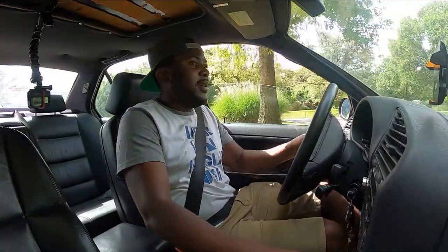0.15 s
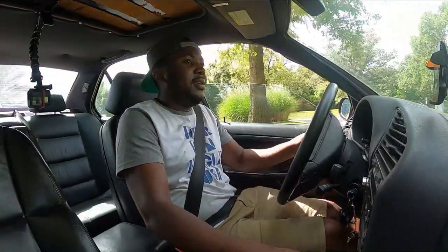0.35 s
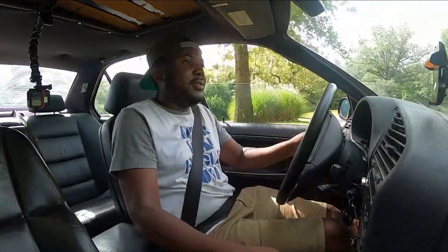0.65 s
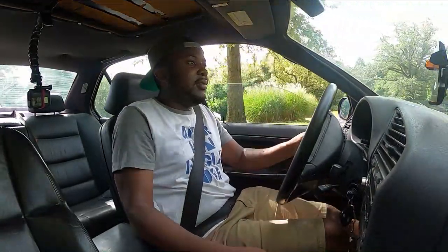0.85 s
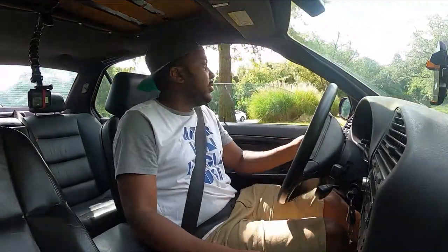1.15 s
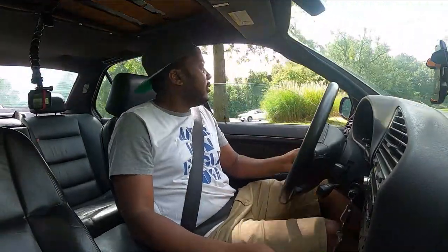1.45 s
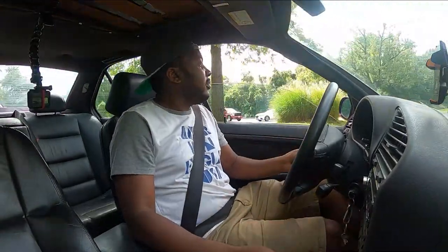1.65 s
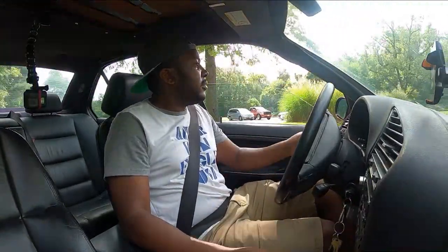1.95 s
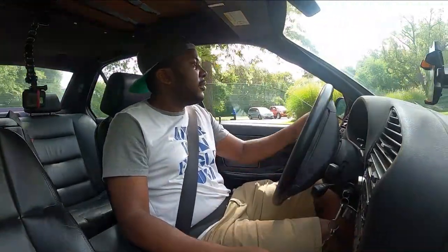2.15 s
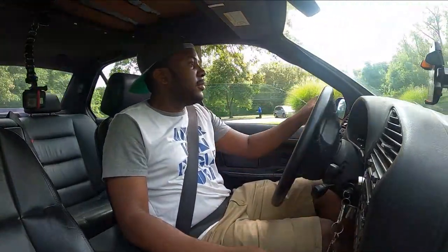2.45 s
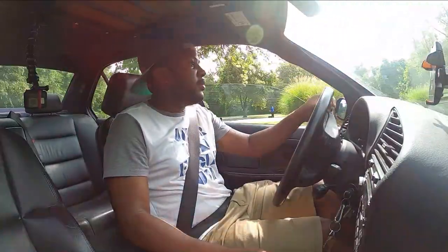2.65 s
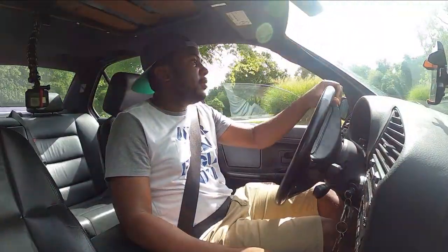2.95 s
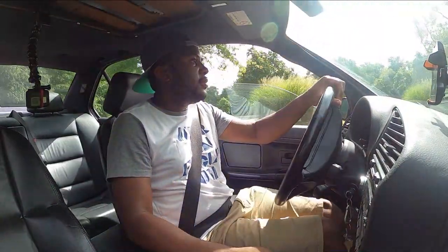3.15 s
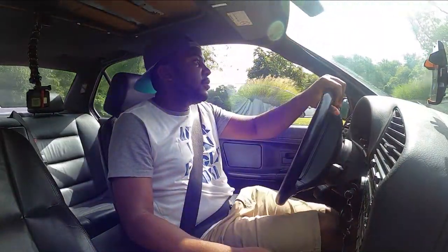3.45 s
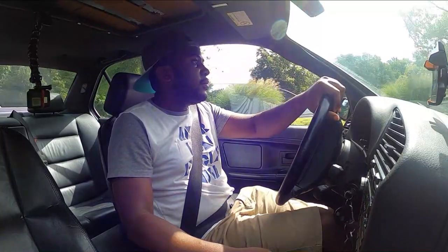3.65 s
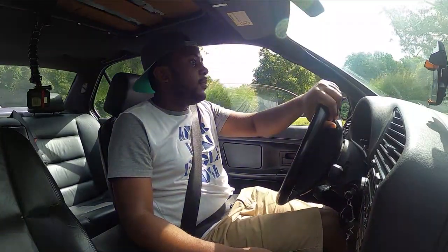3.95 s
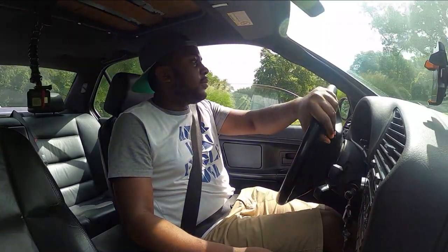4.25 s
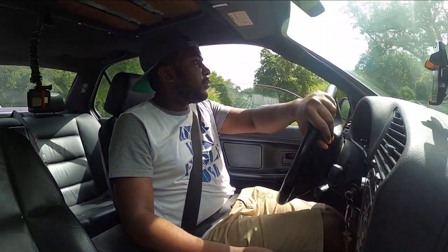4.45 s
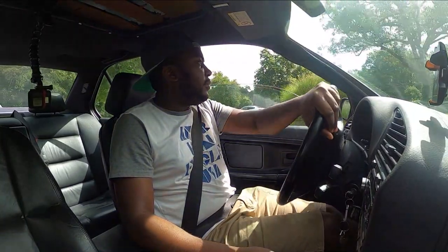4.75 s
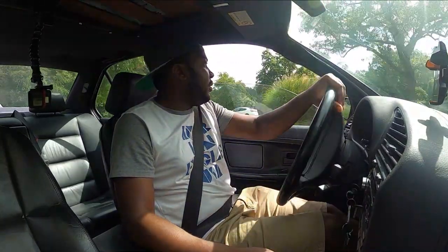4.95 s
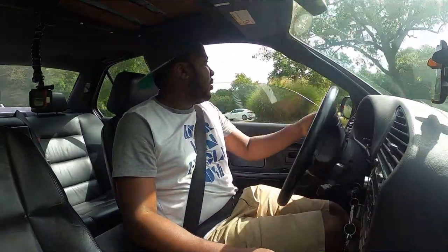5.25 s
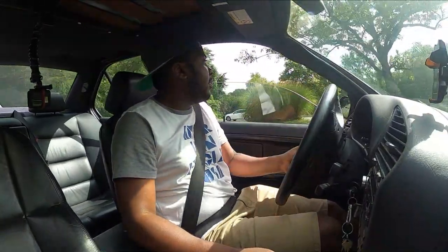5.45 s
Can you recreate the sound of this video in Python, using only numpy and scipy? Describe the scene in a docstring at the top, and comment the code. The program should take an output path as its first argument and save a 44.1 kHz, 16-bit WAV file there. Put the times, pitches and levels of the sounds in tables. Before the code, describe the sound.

Inside a moving car, a deep exhaust drone drops at a gear change, pulls again, then coasts down under rattling plastic trim and soft road rumble.

```python
"""Inside a slowly moving car, one microphone in the cabin. The exhaust drones as sines on multiples
of one slow beat, drops as a gear is changed, pulls again and coasts down. Plastic trim rattles as
decaying modes; fittings tick and scuffs rub as shaped noise bursts; suspension thumps and squeaks are
swept or damped sines. Behind them lie noise bands for road rumble, sway, hiss and whine, and low hums."""
import sys
import numpy as np
from scipy import signal
from scipy.fft import rfft, irfft
from scipy.io import wavfile
from scipy.ndimage import uniform_filter1d

SR = 44100
rng = np.random.default_rng(int(sys.argv[2]) if len(sys.argv) > 2 else 0)


def generate_wav(sig):
    """Save sig (samples, or channels by samples) to the path in sys.argv[1] as 16-bit PCM at SR."""
    pcm = np.round(np.clip(np.atleast_2d(sig).T, -1, 1) * 32767).astype(np.int16)
    wavfile.write(sys.argv[1], SR, pcm)


N = 246809

# tyre rumble: (t/s, level/dB)
TYRE_CURVE = [(0, -37), (.5, -32), (1.2, -33.5), (1.5, -33.5), (1.9, -36), (2.9, -37), (3.3, -36.5),
              (3.9, -35.5), (4.8, -34.5), (5.6, -32)]
# road: (t/s, body sway level/dB, hiss level/dB, hiss lift above 2 kHz/(dB per octave))
ROAD_CURVE = [(0, -38, -35.5, 5), (.15, -36.5, -40, 4.5), (.6, -40, -41.5, 3), (1.03, -43, -46.5, 2),
              (1.6, -46, -44.5, 5), (1.95, -55.5, -44.5, 3.5), (2.25, -52.5, -46, 2),
              (2.73, -43.5, -46.5, 5.5), (3.05, -51.5, -44, -1.5), (3.3, -46.5, -44, -0.5),
              (3.5, -38, -42, -1.5), (3.96, -49, -44.5, -1), (4.47, -48, -43, -4), (4.9, -51, -43, -2.5),
              (5.11, -37, -43.5, 0.5), (5.3, -46, -46, 2.5), (5.6, -45, -42.5, 5.5)]
# noise colours: (f/Hz, relative level/dB)
RUMBLE_SPECTRUM = [(55, -16), (95, 3), (140, 1.5), (185, 2), (230, 3.5), (280, -2.5), (345, -11),
                   (420, -14), (600, -62.5)]
SWAY_SPECTRUM = [(22, -35.5), (32, -3), (44, 8), (60, -2.5), (85, -18.5), (130, -58.5)]
HISS_SPECTRUM = [(210, -24.5), (350, 3), (580, -8), (641, -8.5), (720, -0.5), (785, -3.5), (1050, -11.5),
                 (1440, -17.5), (1790, -18), (2350, -22.5), (5050, -37), (5830, -41.5), (9500, -57),
                 (12500, -76.5), (14500, -120)]
# gliding noise bands: (start f/Hz, glide/(Hz per s), width/Hz, start level/dB, fall/(dB per s))
WHINE_BANDS = [(3660, -250, 260, -57, 45.5), (5050, -850, 290, -59.5, 25.5), (2466, -200, 1000, -51, 44),
               (5910, -1.5, 510, -78.5, 0.5)]
# low hums apart from the exhaust, one table each; the last two overlap: (t/s, f/Hz, level/dB)
HUM_PATHS = [
    [(0, 340.7, -36), (.06, 349.2, -38.5), (.13, 338.5, -36), (.21, 357.6, -39), (.3, 352, -36),
     (.56, 345.6, -38.5), (.88, 310.3, -49), (1.0, 301, -53)],
    [(4.5, 347.3, -46), (4.59, 335.4, -40), (4.72, 311.7, -50), (4.95, 294.5, -52)],
    [(4.6, 231.8, -48.5), (5.15, 226.4, -36), (5.45, 224.3, -49)],
]
# one table a squeak tone; the two at 1.59 s sound together as one squeak:
# (t/s, f/Hz, level of the tone without its octave/dB)
SQUEAK_PATHS = [
    [(1.59, 6400, -66), (1.665, 6350, -72)],
    [(1.59, 10350, -77), (1.655, 10400, -75)],
    [(2.345, 6330, -60), (2.4, 6316, -77.5)],
    [(5.025, 5176, -78), (5.04, 5470, -61), (5.075, 5690, -65), (5.09, 6010, -63), (5.115, 5950, -66),
     (5.15, 5620, -73), (5.19, 5870, -72), (5.25, 6020, -73), (5.295, 5900, -71), (5.335, 6050, -62)],
]
# suspension thumps: (t/s, swing level/dB, panel boom level/dB)
THUMP_EVENTS = [(.447, -21, -42), (.472, -16, -15.5), (.625, -20.5, -21), (.93, -30, -23), (.739, -29, -41),
                (1.328, -17, -38)]
# scuffs over the trim, and a short noisy ring with the tick at 1.55 s:
# (t/s, length/s, level/dB, tilt/(dB per octave), ring f/Hz)
SCUFF_EVENTS = [(0.457, 0.031, -34, -13, 750), (0.485, 0.027, -45, -9, 1790), (0.533, 0.034, -40, -14, 780),
                (0.611, 0.032, -42, -12, 1770), (0.905, 0.064, -42, -12, 860),
                (0.929, 0.023, -43, -18, 1840), (1.465, .11, -39.5, -12, 799.7),
                (1.806, 0.013, -55, -7.5, 2693), (1.547, 0.0092, -44, 0, 4213),
                (1.6, 0.033, -55.5, -8, 2500), (1.691, .015, -55.5, -7, 2800),
                (2.68, 0.042, -53, -10.5, 1480), (3.318, 0.021, -49, -11, 799),
                (3.833, 0.081, -66, -2, 4143), (4.394, 0.045, -50, -16, 790.5),
                (5.163, 0.034, -62, -7.5, 3222), (5.228, 0.051, -58, -7, 3428),
                (4.431, 0.041, -52.5, -10.5, 1690), (5.416, 0.01, -40, -8.5, 3100),
                (5.414, 0.036, -47.5, -8, 1970), (5.503, 0.0097, -44, -12, 3020),
                (5.555, 0.014, -52, -13, 3135)]
# ticking fittings: (t/s, level/dB, tilt/(dB per octave))
TICK_EVENTS = [(.175, -43, -2.5), (.2927, -43.5, -11), (.4767, -44.5, -12), (1.1486, -43.5, -11),
               (1.3443, -50, -1.5), (1.3734, -48.5, -9), (1.5496, -34, -3), (1.8145, -44.5, -6.5),
               (2.0503, -47.5, -4.5), (2.0832, -48, -9.5), (2.1848, -53.5, -1.5), (2.8391, -50, -13.5),
               (2.9698, -52.5, -13.5), (3.021, -42.5, -7), (3.2817, -50, -13), (3.3045, -51.5, -12.5),
               (3.353, -54.5, -14.5), (3.7311, -52.5, -9.5), (3.8032, -51, -9.5), (4.1567, -45.5, -12),
               (4.4243, -46.5, -12), (4.7726, -46.5, -12), (5.0744, -50, -5), (5.3392, -50, -9),
               (5.394, -51, -11), (5.374, -50, -11), (5.4146, -46, -11), (5.4998, -41, -11.5),
               (5.5503, -42.5, -12)]
# modes of the plastic trim: (f/Hz, level/dB, t60/s)
TRIM_MODES = [(663.6, -8, 0.035), (771, -6.5, 0.03), (1351, -6, 0.031), (1580, -0.5, 0.014),
              (2726, 2.5, 0.014), (3210, -12, 0.018)]
# blows on the trim: (t/s, level/dB, dull modes/dB, bright modes/dB, lean to the lower middle mode/dB)
RATTLE_EVENTS = [(0.291, -36, -10.0, -3, -3), (0.3206, -23.5, 2, -16, -3), (0.3494, -29.5, 7.5, -9, 3.0),
                 (0.4645, -29, 10.5, -15, -4), (0.4745, -33, 13.5, -19, -3), (0.5174, -38, 7, -2, 4),
                 (0.549, -39, 14.5, -15.0, 5), (0.579, -38, 12, -19, -9), (0.617, -33, 11, -6, -12),
                 (0.778, -33, 8, -20, -7), (0.8217, -36, 9, -17, 3), (0.9083, -30, -1, -16, 0),
                 (0.932, -29.5, -3, -30, -3.0), (1.068, -40, 13.5, -12, -4), (1.1495, -42, 11, -3, 5),
                 (1.3848, -33, 6, -6, -1), (1.415, -35, 3, -10, -2), (1.444, -34, 5, -9, 11),
                 (1.516, -32, 1, -10.0, 0), (1.7543, -29.5, 6, -32, -12), (1.7854, -31, 7.5, -21, -7),
                 (1.81, -41, -6, 0, -9), (1.832, -24, 1, -10.0, -6.5), (1.8415, -31, -6, -3.5, 8),
                 (1.849, -24, -0.5, -10.5, -8), (1.9042, -23, -1, -9.5, 9), (1.9114, -25, -8, -18, -12),
                 (1.9328, -25, 3, -13, -9), (1.9677, -26.5, 1, -10, 10), (1.9763, -23.5, -1, -18, -8),
                 (2.0204, -27, 1, -30, -8), (2.038, -29.5, 5, -18, -6), (2.0818, -29.5, 3.0, -23, -5),
                 (2.14, -32.5, 7, -17.0, -8), (2.1824, -27, 4, -17, -8), (2.2228, -31.5, 2.5, -20.5, -12.5),
                 (2.364, -43, 1, -27.5, 0), (2.388, -29.5, 5, -31, -15), (2.429, -41, 12, -22.5, -3.5),
                 (2.5059, -37, 5, -11.5, -2.5), (2.575, -29.5, 5, -8, 9), (2.5817, -25, 2, -15, -15),
                 (2.61, -32.5, 8.5, -25, -6.5), (2.6391, -29.5, -1.5, -13.5, 13), (2.689, -35, 4, -10.5, 8),
                 (2.696, -37, 9, -22.5, -11), (2.713, -36.5, -5, -6, 9), (2.721, -34.5, 9, -16, 0.5),
                 (2.7375, -31.5, -7, -12.5, 12), (2.7853, -27, -3.5, -8.5, 12.5),
                 (2.831, -29.5, -1, -9, 12), (2.8917, -37, 5, -14.5, 2), (2.9143, -32.5, -1, -12.0, 10),
                 (2.9391, -31, 1, -16, 8), (2.961, -29.5, 0.5, -11, 10.5), (2.9686, -27, -1.5, -10, -5),
                 (2.9908, -28, 2.5, -18, -5.5), (3.037, -38, 5, -18, -5), (3.0846, -31.5, 1.5, -30.5, -8),
                 (3.094, -36, 10, -23.5, -3), (3.1322, -41, 10, -22.0, -10), (3.2552, -34.5, 5, -17, -8),
                 (3.3315, -36.0, -1, -10, -5), (3.4274, -36.0, 6, -20, -2.5), (3.478, -32, 8, -23, -10.5),
                 (3.498, -37.5, 6, -9, -5), (3.533, -22.5, 0, -11, 5), (3.563, -30, 2.5, -21.0, -8),
                 (3.6607, -29.5, 4.5, -26, -12), (3.676, -23.5, -9, -12, 19), (3.709, -31, 6.5, -23, -6),
                 (3.8035, -39, 12, -5, 2.0), (3.847, -34.5, -1, -11, 0), (4.197, -33.5, -8, -12.5, -5.5),
                 (4.246, -38.5, 5, -23, -2), (4.3918, -33.5, 8, -26, 8), (4.4041, -28, 6.5, -22, -4),
                 (4.4245, -40.0, -1, -18, 1), (4.7727, -46, 11, -3, -5), (4.93, -31.5, 2, -19, 6),
                 (4.9523, -27.5, 7, -20, 0), (4.982, -18, 4.5, -14, -10), (5.0447, -32, 3, -16, -14),
                 (5.4146, -28, 11.5, -6.5, -3), (5.4997, -28, 7, -10, 2), (5.5498, -21.5, -1, -16, -3)]
# engine: (t/s, beat of the exhaust f/Hz, throttle as drone level/dB)
ENGINE_CURVE = [(0, 43.3, -36.5), (.06, 48, -34), (.26, 47.4, -34.5), (.38, 48.6, -35.5), (.46, 47, -40.5),
                (.58, 48.15, -40.5), (.74, 45.57, -44.5), (1.04, 39.3, -43), (1.09, 35, -44),
                (1.14, 34.6, -40), (1.2, 33.2, -42.5), (1.245, 32.7, -43), (1.3, 31.8, -37.5),
                (1.42, 34.8, -34.5), (1.51, 33.6, -34.5), (1.64, 27.6, -36.5), (1.78, 33.3, -34),
                (1.9, 30.3, -35), (2.01, 34.8, -34), (2.11, 32.9, -35), (2.23, 37.1, -34.5),
                (2.36, 36.4, -35), (2.45, 38.8, -33.5), (2.54, 38.6, -34), (2.71, 41.4, -34),
                (2.81, 42.03, -34), (3.06, 43.34, -37), (3.24, 44.2, -43.5), (3.4, 43.6, -43.5),
                (3.58, 42, -41.5), (3.74, 39.9, -44), (3.9, 37.4, -43), (4.1, 32, -43), (4.33, 29.3, -43),
                (4.5, 24.8, -43.5), (4.73, 22.6, -47.5), (4.95, 20.6, -47.5), (5.15, 19.5, -49),
                (5.6, 20.1, -46.5)]
# exhaust: (multiple of the beat, level/dB, dB gained per dB of throttle above OPEN_DB)
EXHAUST_ORDERS = [(1, -13.5, -1.5), (2, 4, 1.73), (3, -2, 1.1), (4, 11, 1.77), (5, 1.5, 1.1),
                  (6, 8.5, 1.63), (7, -3.5, 1), (8, 0.5, 1), (9, -4, 2.8), (10, -10, -0.2), (11, -10, 0.9),
                  (12, -3.5, 1.5)]
# what pipe and cabin pass on: (f/Hz, even multiples level/dB, odd multiples level/dB)
PIPE_RESPONSE = [(29.8, -10, -16.5), (42, 3, -11), (59, 5.5, -1.5), (71.5, 9, 5.5), (103, -7.5, -16),
                 (122, -2.5, -5), (136, -8, -3.5), (151.3, -4.5, -0.5), (154.26, 3, 3), (171.7, 10, 9.5),
                 (185.8, 7.5, 8.5), (198.6, 4, 5), (226, -2, 4), (267, -4, -4.5), (293, -15.5, -17),
                 (362, -8, -8.5), (397, -7, -8.5), (438, -17, -18), (610, -27.5, -24)]

OPEN_DB = -34  # throttle level about which the multiples answer
WAVER_DB, WAVER_PER_DB_SHUT = .4, .08  # waver at open throttle; extra dB per dB below it
SLIP = .06  # phase slip of the fourth multiple, radians per dB of waver
STANDING_HZ, STANDING_WIDTH_HZ = (71, 143), 3  # standing waves in the pipe
SPREAD = -.85  # radians, times the multiple squared
PANEL_HZ, PANEL_T60_S = 317, .06
THUMP_HZ, THUMP_T60_S = 56.5, 0.18
TICK_RISE_S, TICK_T60_S = .0012, 0.059
OCTAVE_DB, OCTAVE_HZ, OCTAVE_FALL_DB_PER_KHZ = -3, 11950, 13.5  # a squeak's octave, loudest at OCTAVE_HZ
CABIN_DB, CABIN_T60_S = -12, 0.077
EDGE_HZ = 14800  # upper band limit


def gain_of(db):
    """Decibels to amplitude."""
    return 10 ** (np.asarray(db) / 20)


def evened(x):
    """Scales to an rms of one."""
    return x / np.sqrt(np.mean(x ** 2) + 1e-20)


def read(points, hz):
    """Looks up a spectrum on a log-frequency axis."""
    f, value = np.transpose(points)
    return np.interp(np.log(hz + 1), np.log(f + 1), value)


def columns(rows, t):
    """Every column of a curve table at the times t."""
    s, *rest = np.transpose(rows)
    return [np.interp(t, s, c) for c in rest]


def add(mix, s, sound):
    """Mixes a sound in at s seconds."""
    part = mix[round(s * SR):][:len(sound)]
    part += sound[:len(part)]


def wander(width_s, count):
    """Smooth random curves of rms one."""
    size = max(round(width_s * SR), 1)
    smooth = uniform_filter1d(rng.standard_normal((count, N)), size)
    return evened(uniform_filter1d(smooth, size))


def noise(spectrum, size, patchy_db, lift_db=0):
    """Random short-time spectra with drifting patches; lift tilts the part above 2 kHz."""
    hop = size // 4
    frames, hz = N // hop + 5, np.fft.rfftfreq(size, 1 / SR)
    a, b, patches = rng.standard_normal((frames, len(hz), 3)).T
    patches = uniform_filter1d(patches, size=6, axis=0)  # along frequency
    patches = evened(uniform_filter1d(patches, size=10, axis=1))  # along time
    lift = np.interp(np.arange(frames) * hop, np.arange(N), lift_db * np.ones(N))
    treble_octaves = np.clip(np.log2(hz / 2000 + 1e-9), 0, 3)[:, None]
    level_db = read(spectrum, hz)[:, None] + patchy_db * patches + treble_octaves * lift
    z = (a + 1j * b) * gain_of(level_db)
    return evened(signal.istft(z, nperseg=size, noverlap=size - hop)[1][:N])


def tilted(white, tilt_db):
    """Noise sloped by dB per octave about 5 kHz, more gently above 6 kHz, without bass or top."""
    hz = np.fft.rfftfreq(len(white), 1 / SR)
    octaves = np.log2(np.maximum(hz, 700) / 5000) - 0.21 * np.log2(np.maximum(hz, 6000) / 6000)
    no_bass = hz ** 2 / (hz ** 2 + 500 ** 2)
    no_top = 1 / (1 + (hz / 10500) ** 6)
    return irfft(rfft(white) * gain_of(min(tilt_db, 0) * octaves) * no_bass * no_top)


def cabin(x):
    """Short upholstered-cabin tail: sparse taps of random sign."""
    taps, at = np.zeros(6000), np.arange(100, 5980, 20) + rng.integers(0, 20, 294)
    taps[at] = rng.choice([-1., 1.], len(at)) * gain_of(-60 * at / SR / CABIN_T60_S)
    return signal.oaconvolve(x, taps / np.linalg.norm(taps))[:N]


def road():
    """Tyre rumble through the floor, slow sway of the body and flickering hiss from outside."""
    t = np.arange(N) / SR
    (rumble_db,) = columns(TYRE_CURVE, t)
    sway_db, hiss_db, lift_db = columns(ROAD_CURVE, t)
    rumble = noise(RUMBLE_SPECTRUM, size=4096, patchy_db=2.0)
    sway = noise(SWAY_SPECTRUM, size=8192, patchy_db=0.0)
    hiss = noise(HISS_SPECTRUM, size=512, patchy_db=1.5, lift_db=lift_db)
    flicker_db = 1.3 * wander(0.0099, count=1)[0]
    return gain_of(rumble_db) * rumble + gain_of(sway_db) * sway + gain_of(hiss_db + flicker_db) * hiss


def whine():
    """Downward-gliding noise bands, each fading at its own rate: low-passed noise shifted up in pitch."""
    t, out = np.arange(N) / SR, np.zeros(N)
    draws = rng.standard_normal((len(WHINE_BANDS), 2, N))
    for (hz, glide, width_hz, db, fall_db), (a, b) in zip(WHINE_BANDS, draws):
        slow = signal.lfilter(*signal.butter(2, width_hz / SR), a + 1j * b)
        carrier = np.exp(2j * np.pi * (hz + glide * t / 2) * t)
        out += gain_of(db - fall_db * t) * evened((slow * carrier).real)
    return out


def hums():
    """Rough low tones that drift apart from the exhaust: sines unsteady in pitch and level."""
    out = np.zeros(N)
    waver_db, drift = 2.3 * wander(0.034, count=1)[0], 0.008 * wander(0.022, count=1)[0]
    for rows in HUM_PATHS:
        t = np.arange(rows[0][0], rows[-1][0], 1 / SR)
        hz, db = columns(rows, t)
        tone = np.sin(2 * np.pi * np.cumsum(hz * (1 + drift[:len(t)])) / SR)
        fade = signal.windows.tukey(len(t), .1)
        add(out, t[0], np.sqrt(2) * tone * gain_of(db + waver_db[:len(t)]) * fade)
    return out


def squeaks():
    """Thin stick-slip tones with an octave, jittering in pitch and fluttering in level."""
    out = np.zeros(N)
    flutter_db, jitter = 2.6 * wander(0.0044, count=1)[0], .009 * wander(0.0022, count=1)[0]
    for rows in SQUEAK_PATHS:
        t = np.arange(rows[0][0], rows[-1][0], 1 / SR)
        hz, db = columns(rows, t)
        octave_db = OCTAVE_DB - OCTAVE_FALL_DB_PER_KHZ * abs(2 * hz - OCTAVE_HZ) / 1000
        angle = 2 * np.pi * np.cumsum(hz * (1 + jitter[:len(t)])) / SR
        tone = np.sin(angle) + gain_of(octave_db) * np.sin(2 * angle)
        fade = signal.windows.tukey(len(t), min(0.023 * SR / len(t), 1))
        add(out, t[0], np.sqrt(2) * tone * gain_of(db + flutter_db[:len(t)]) * fade)
    return out


def thumps():
    """Low damped swings of the body, with a short boom of the floor panel."""
    out, t = np.zeros(N), np.arange(12000) / SR
    swing = gain_of(-60 * t / THUMP_T60_S) * np.sin(2 * np.pi * THUMP_HZ * t) * np.minimum(t / 0.0082, 1)
    boom = gain_of(-60 * t / PANEL_T60_S) * np.sin(2 * np.pi * PANEL_HZ * t) * np.minimum(t / 0.0022, 1)
    for s, db, boom_db in THUMP_EVENTS:
        add(out, s, gain_of(db) * swing + gain_of(boom_db) * boom)
    return out


def scuffs():
    """Grainy noise bursts, each with one broad ring: friction on the trim, and the ring with one tick."""
    out, grain_db = np.zeros(N), 4.5 * wander(.0013, count=1)[0]
    draws = rng.standard_normal((len(SCUFF_EVENTS), 8192))
    for (s, length_s, db, tilt_db, hz), white in zip(SCUFF_EVENTS, draws):
        size = min(round(length_s * SR), 8192)
        ring = evened(signal.filtfilt(*signal.iirpeak(hz, 6., SR), white))
        burst = evened(tilted(white, tilt_db)) + 0.67 * ring
        add(out, s, gain_of(db) * evened(burst)[:size] * signal.windows.tukey(size, .4))
    return out * gain_of(grain_db)


def ticks():
    """Short wide-band snaps with a dying noisy tail."""
    out, t = np.zeros(N), np.arange(4096) / SR
    for (s, db, tilt_db), white in zip(TICK_EVENTS, rng.standard_normal((len(TICK_EVENTS), 4096))):
        envelope = gain_of(db - 60 * t / TICK_T60_S) * np.minimum(t / TICK_RISE_S, 1)
        add(out, s, envelope * tilted(white, tilt_db))
    return out


def knock(dull_db, bright_db, lean_db, detune):
    """One soft blow on the trim: decaying modes weighted by where it lands."""
    t = np.arange(3000) / SR
    # a positive lean weakens the upper middle mode, a negative one the lower
    weight_db = [dull_db, dull_db, min(lean_db, 0), min(-lean_db, 0), bright_db, bright_db]
    ring = sum(gain_of(db + w - 60 * t / t60) * np.sin(2 * np.pi * hz * d * t)
               for (hz, db, t60), w, d in zip(TRIM_MODES, weight_db, detune))
    return ring * (1 - np.exp(-(t / 0.00087) ** 2))  # contact takes a moment


def trim():
    """The loud rattles, each with one weaker bounce on another spot, and a random chatter of faint ones."""
    out = np.zeros(N)
    detune = 1 + 0.016 * rng.standard_normal((len(RATTLE_EVENTS), len(TRIM_MODES)))
    bounces = rng.random((len(RATTLE_EVENTS), 2))
    for (s, db, dull_db, bright_db, lean_db), d, (late, weak) in zip(RATTLE_EVENTS, detune, bounces):
        add(out, s, gain_of(db) * knock(dull_db, bright_db, lean_db, d))
        bounce_s = s + .0035 + .007 * late
        bounce_db = db - 20.25 - 13.5 * weak
        add(out, bounce_s, gain_of(bounce_db) * knock(dull_db, bright_db, -lean_db, d[::-1]))
    struck = rng.random(N) < 90 / SR  # about 90 faint blows per second
    blows = gain_of(4.0 * np.minimum(rng.exponential(1, N), 4)) * struck
    faint = knock(11.0, -9, -6.5, np.ones(len(TRIM_MODES)))
    return out + gain_of(-55.5) * signal.oaconvolve(blows, faint)[:N]


def exhaust():
    """Sines on multiples of the beat, raised by throttle, coloured by pipe; uneven firing makes each waver."""
    t = np.arange(N) / SR
    beat_hz, throttle_db = columns(ENGINE_CURVE, t)
    turns = np.cumsum(beat_hz) / SR
    uneven_db = WAVER_DB + WAVER_PER_DB_SHUT * np.maximum(OPEN_DB - throttle_db, 0)  # rougher off throttle
    waver_db = uneven_db * wander(.07, count=len(EXHAUST_ORDERS))
    slip = SLIP * uneven_db * wander(.07, count=len(EXHAUST_ORDERS))
    drone = np.zeros(N)
    for i, (k, db, answer) in enumerate(EXHAUST_ORDERS):
        pipe = np.take(PIPE_RESPONSE, [0, 1 + k % 2], axis=1)  # even or odd column
        level_db = OPEN_DB + db + answer * (throttle_db - OPEN_DB) + read(pipe, k * beat_hz)
        # each standing wave turns the phase of what passes it
        lag = sum(np.arctan((k * beat_hz - f) / STANDING_WIDTH_HZ) + np.pi / 2 for f in STANDING_HZ)
        # the pipe spreads the multiples in phase; higher ones slip further
        phase = 2 * np.pi * k * turns + SPREAD * k ** 2 - lag + (k / 4) ** 2 * slip[i]
        drone += gain_of(level_db + waver_db[i]) * np.sin(phase)
    return np.sqrt(2) * drone


def scene():
    """All sources at one microphone; trim, ticks and scuffs also feed the cabin tail."""
    small = trim() + ticks() + scuffs()
    small = small + gain_of(CABIN_DB) * cabin(small)
    return (exhaust() + hums() + road() + thumps() + squeaks() + whine() + small)[None]


def record(dry):
    """The microphone dulls the top octave; then the band limit."""
    dull = signal.lfilter(*signal.butter(2, 11500, fs=SR), dry)
    band_limit = signal.firwin(511, EDGE_HZ, window=("kaiser", 9), fs=SR)
    return signal.oaconvolve(dull, band_limit[None], "same")


dry = scene()
out = record(dry)
generate_wav(out)
```